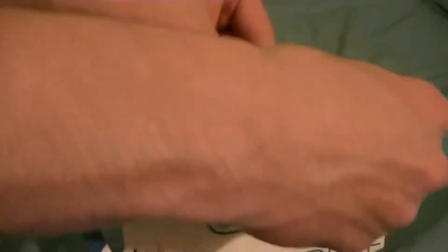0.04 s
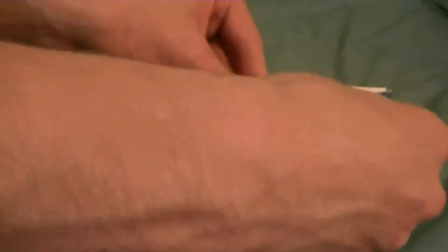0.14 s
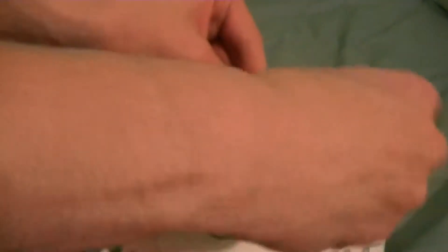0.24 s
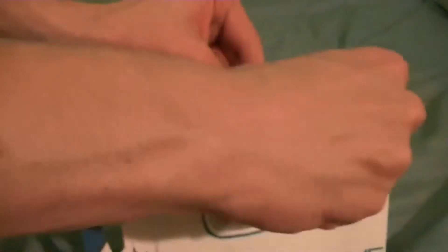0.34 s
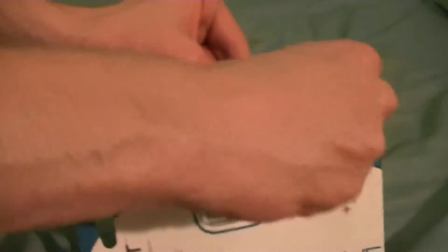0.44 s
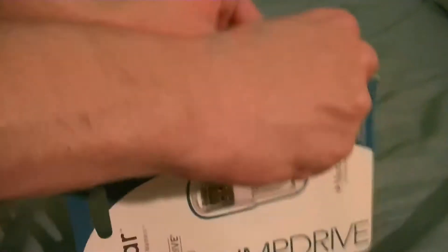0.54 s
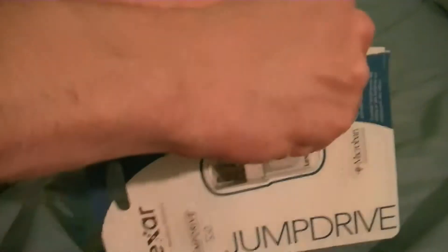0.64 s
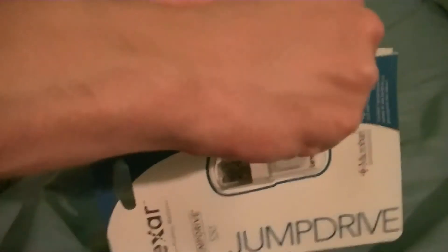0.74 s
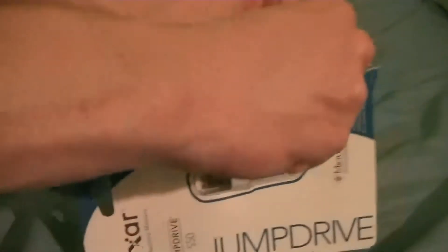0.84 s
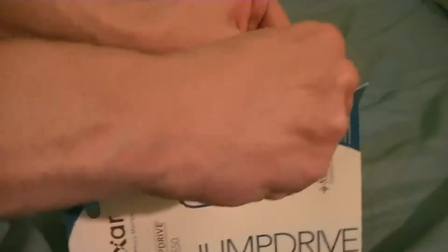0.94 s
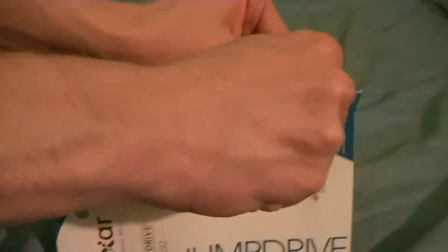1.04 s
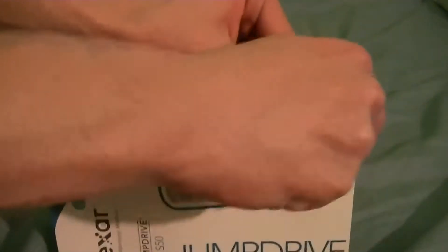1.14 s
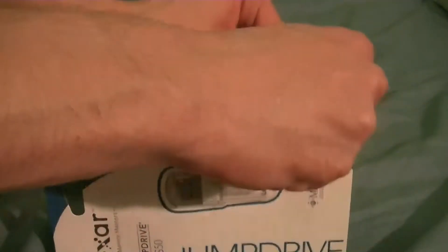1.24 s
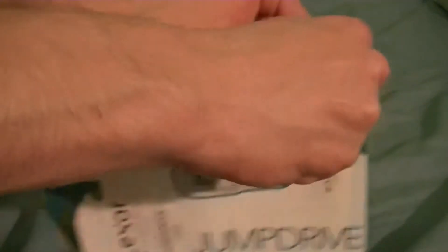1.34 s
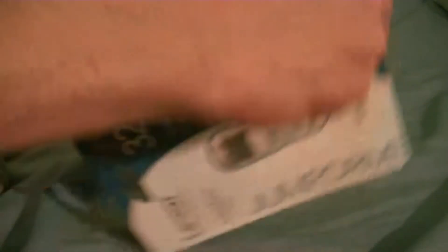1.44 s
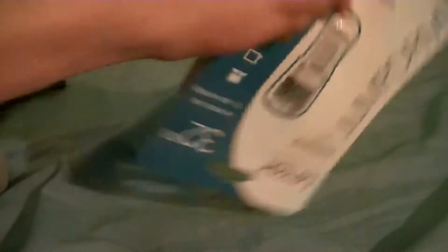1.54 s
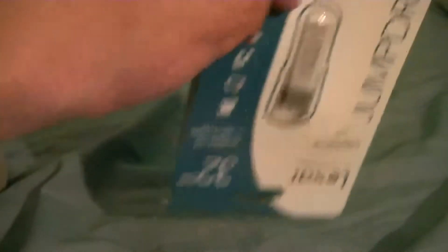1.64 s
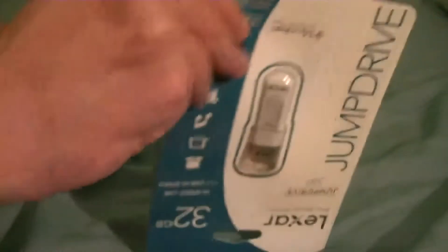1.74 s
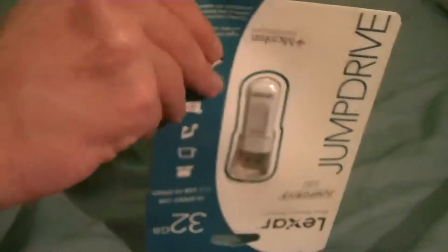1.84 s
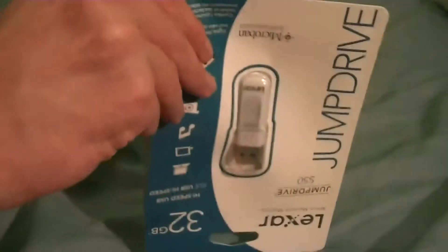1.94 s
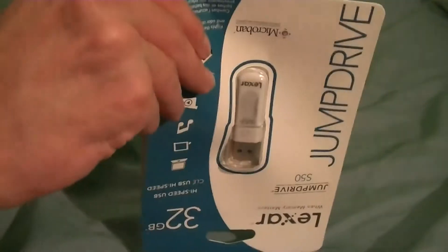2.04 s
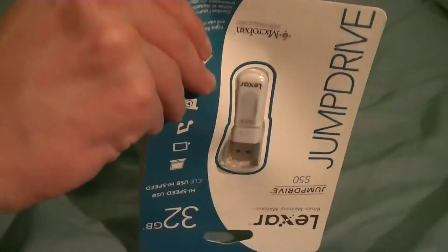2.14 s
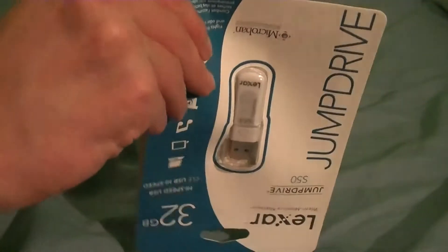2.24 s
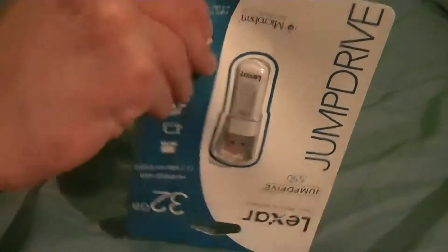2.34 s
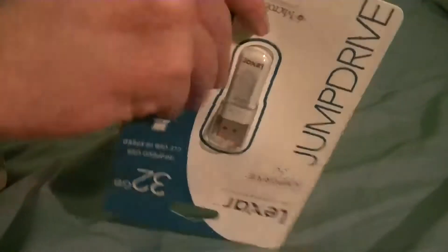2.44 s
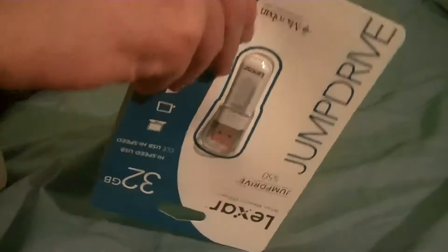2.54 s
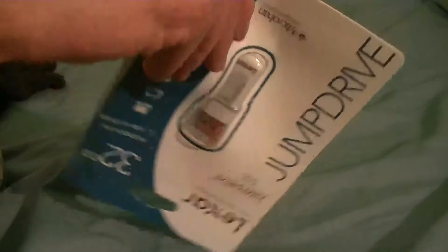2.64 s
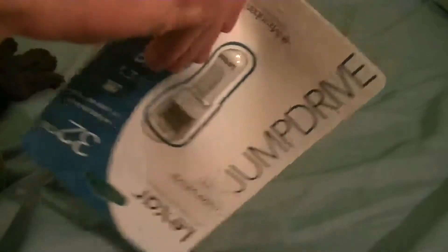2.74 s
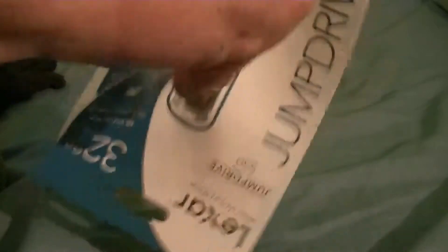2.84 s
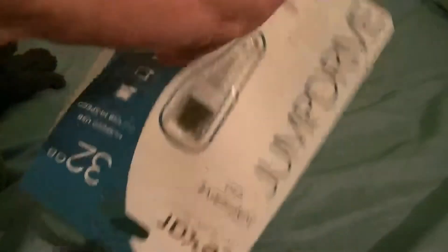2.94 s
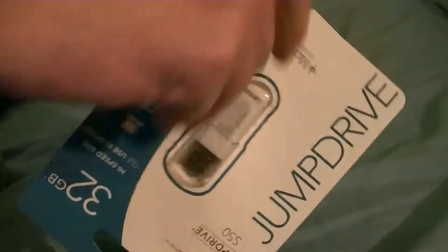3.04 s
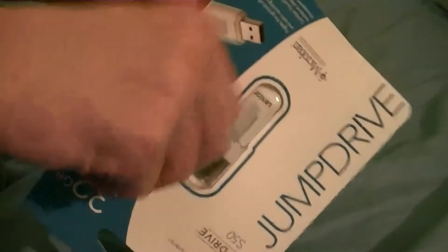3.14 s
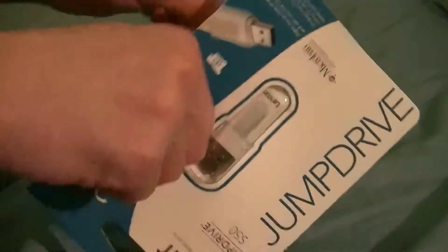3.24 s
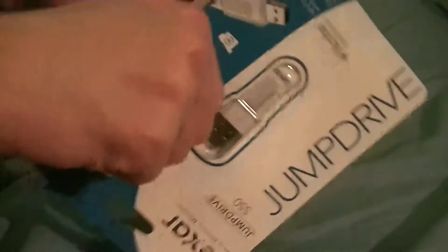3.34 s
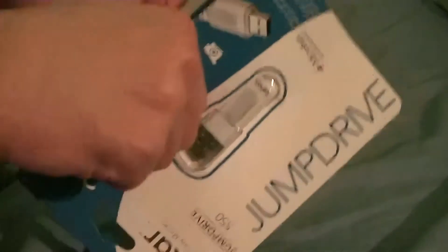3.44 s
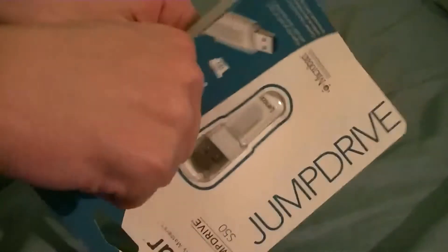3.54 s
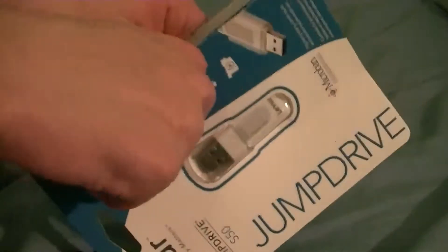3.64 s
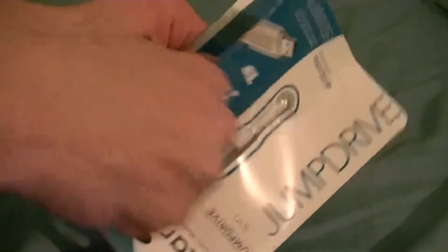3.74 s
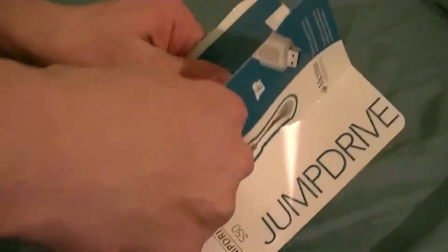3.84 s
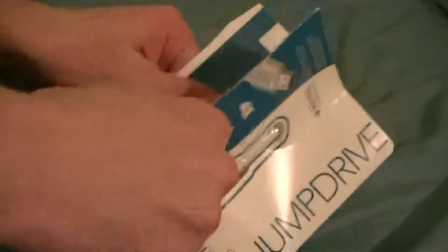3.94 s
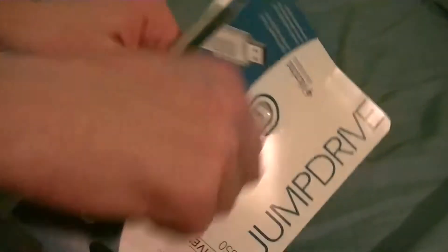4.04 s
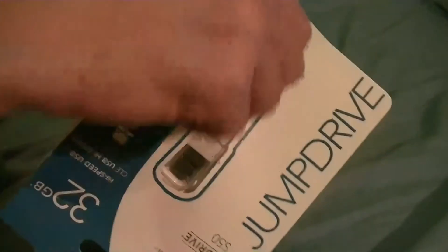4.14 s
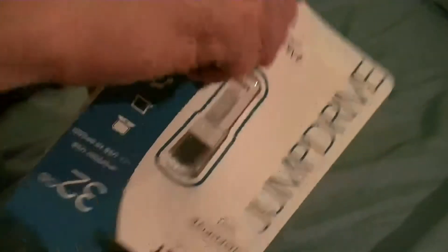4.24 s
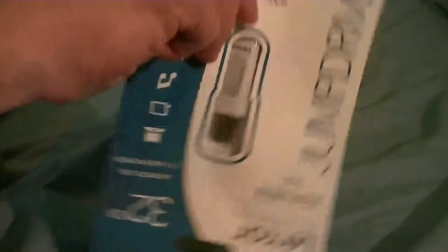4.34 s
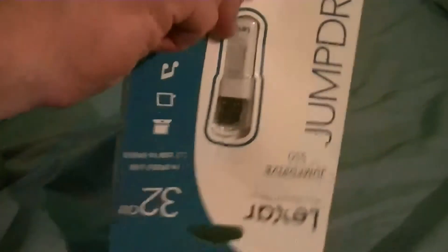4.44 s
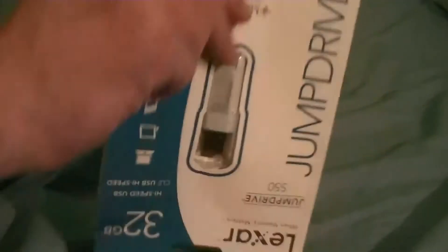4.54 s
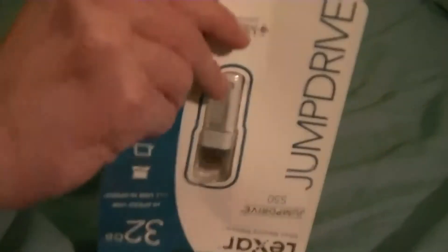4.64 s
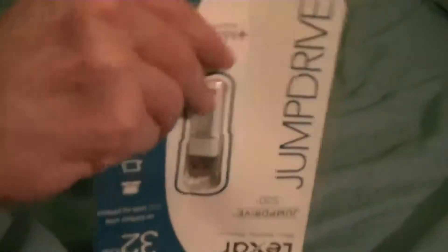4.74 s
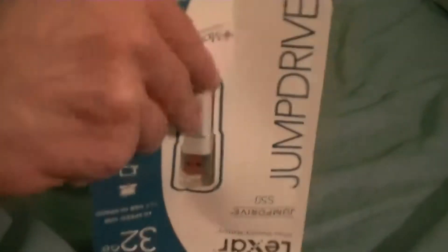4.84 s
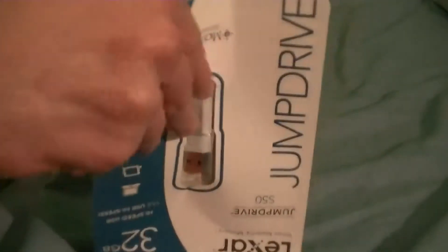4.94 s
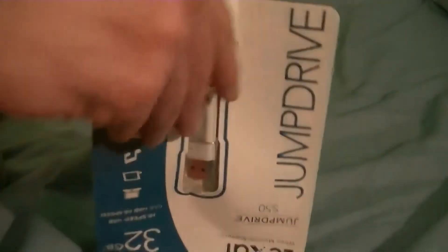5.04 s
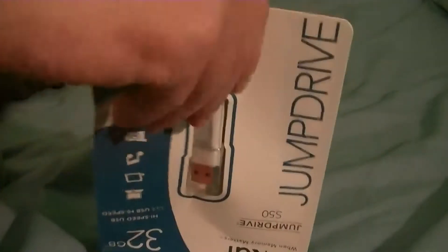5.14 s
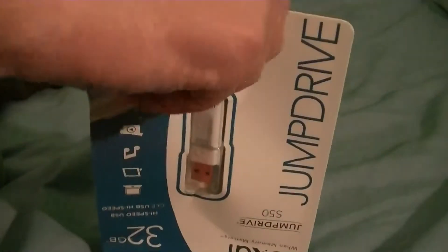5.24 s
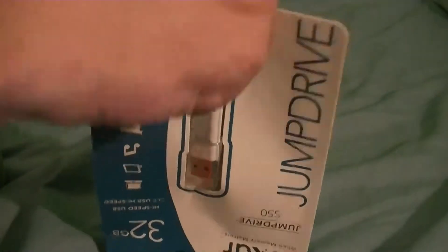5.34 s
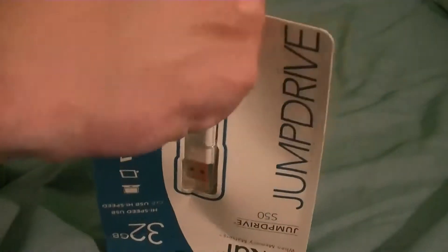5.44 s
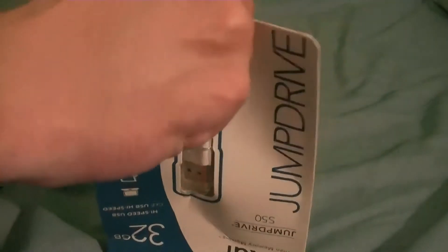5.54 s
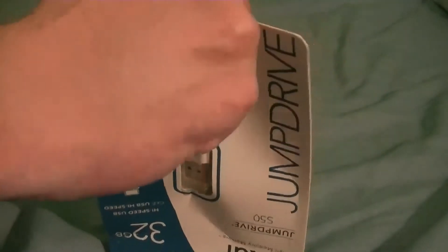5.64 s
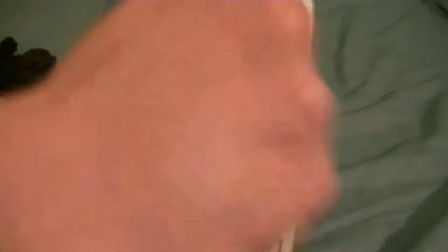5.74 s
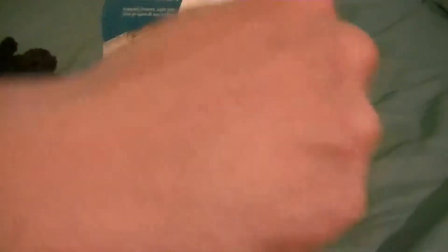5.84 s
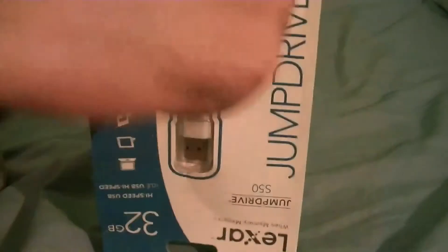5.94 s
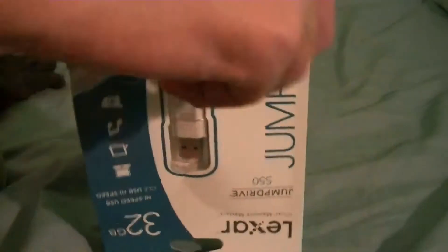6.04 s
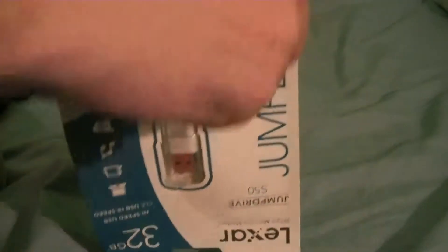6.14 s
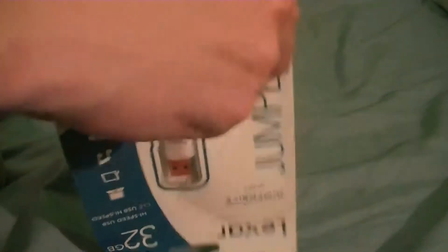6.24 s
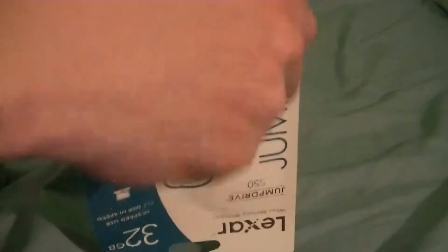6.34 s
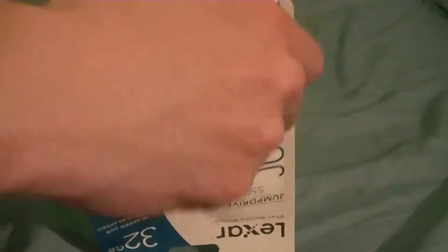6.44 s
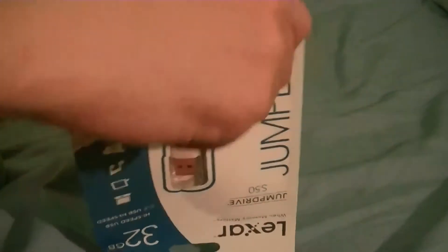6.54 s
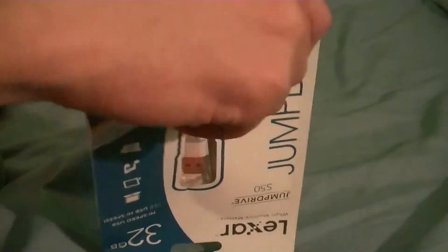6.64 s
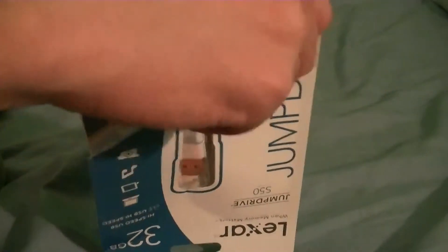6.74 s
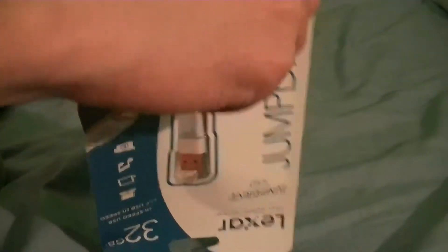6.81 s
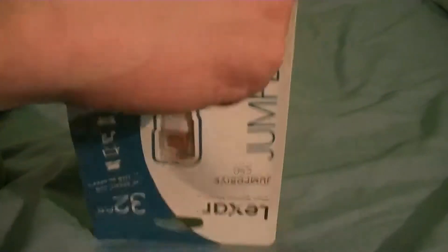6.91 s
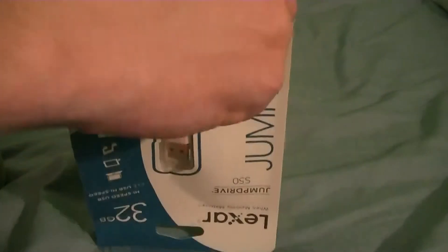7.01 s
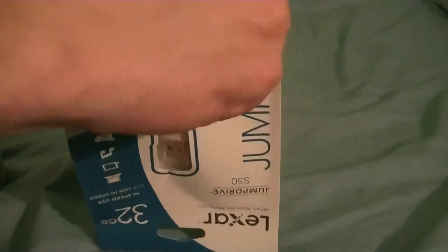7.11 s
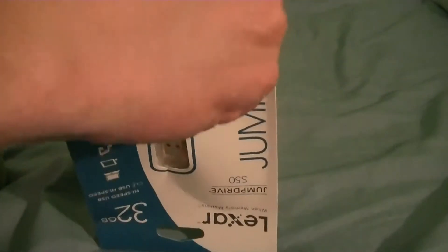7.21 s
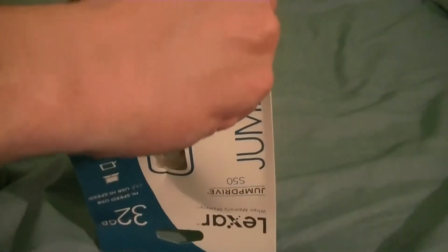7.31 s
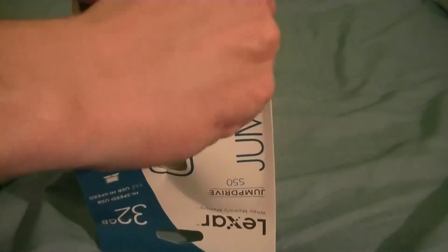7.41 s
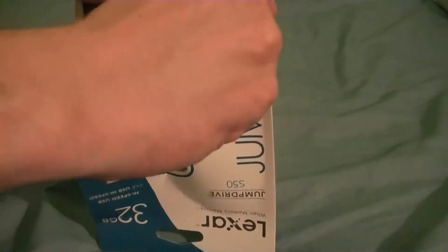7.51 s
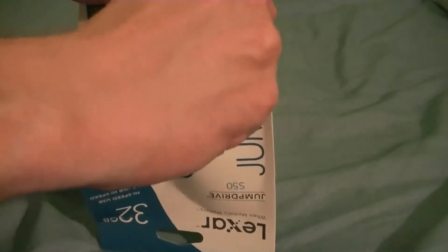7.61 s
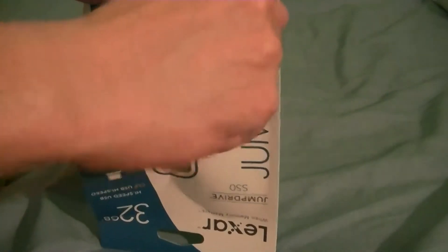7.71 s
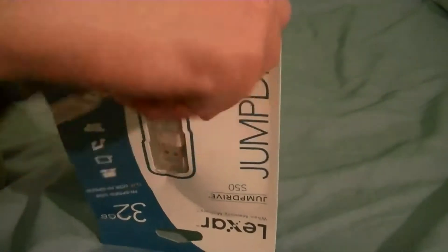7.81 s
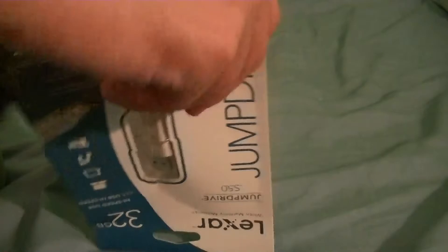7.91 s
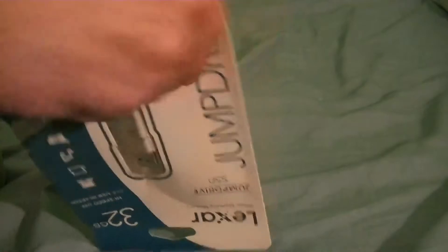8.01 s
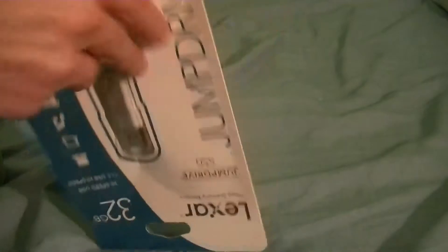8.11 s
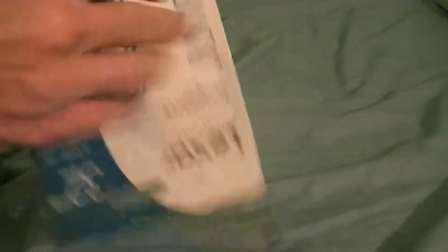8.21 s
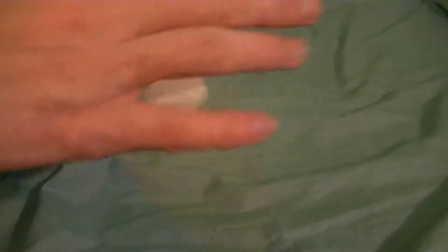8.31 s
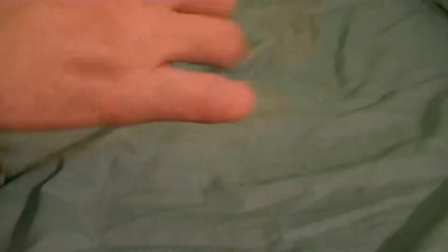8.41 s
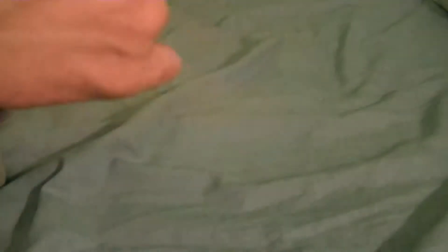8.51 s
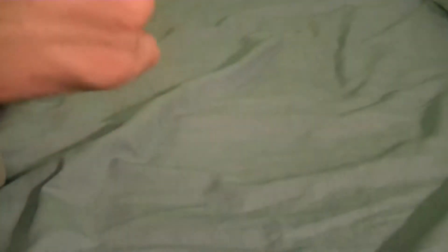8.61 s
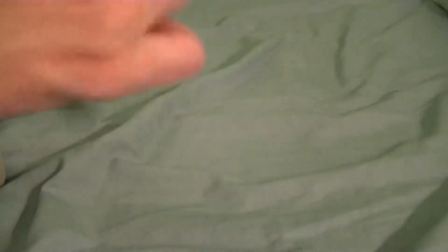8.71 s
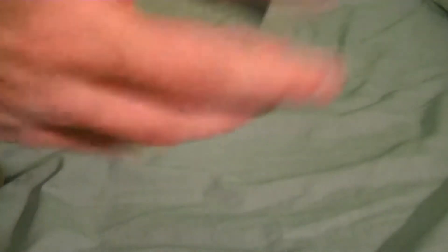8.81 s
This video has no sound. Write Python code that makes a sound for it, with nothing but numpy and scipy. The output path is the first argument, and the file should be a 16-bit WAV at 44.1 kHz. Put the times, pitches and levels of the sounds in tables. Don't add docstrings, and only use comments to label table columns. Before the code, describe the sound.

A blister pack is worked open by hand on a bed, very near the microphone. Dry card rustling swells and fades with each pull; glue and plastic give way in three main clusters of loud snaps, the last the heaviest. Between them are light ticks, fingertip scrapes and short rubbery squeaks. The handling thins out, then a final small flurry of peeling and rustle ends it, with faint air hiss beneath.

```python
import sys
import numpy as np
from scipy import signal
from scipy.io import wavfile
from scipy.ndimage import uniform_filter1d

SR = 44100
rng = np.random.default_rng(int(sys.argv[2]) if len(sys.argv) > 2 else 0)


def volts(x):
    e = np.asarray(x, float) / 20
    return 10 ** e


def master_out(mix):
    frames = np.transpose(np.atleast_2d(mix))
    ceiling = np.clip(frames, -1, 1)
    pcm = np.round(ceiling * 32767).astype(np.int16)
    wavfile.write(sys.argv[1], SR, pcm)


N = 391166

# time in seconds, pressure in dB, card flex in dB.
GRIP = [(0, -63.5, -4.5), (.3, -75, 7), (.39, -56, -1), (.62, -56, -2), (.68, -62.5, -0.5),
        (2.151, -71.5, 5), (2.53, -58.5, -9), (2.72, -62, 2.5), (3.7, -87, -15), (4.84, -75, 2),
        (4.91, -60.5, -5.5), (5.14, -62.5, -5.5), (5.55, -80.5, 12), (7.3, -76.5, 1), (7.661, -69, -2.5),
        (8.08, -59.5, -4), (8.249, -75, 4), (8.87, -76.5, 5)]
# peak in seconds, pressure in dB, build-up in seconds, release in seconds,
# card flex in dB.
PULLS = [(.22, -58, 0.066, 0.14, -2.5), (.89, -54, 0.09, 0.15, -5), (1.41, -52.5, 0.27, 0.12, -2),
         (1.6, -64.5, 0.08, 0.16, -1.5), (2.01, -66, 0.046, 0.075, -3), (2.22, -61.5, 0.049, .1, -2),
         (2.38, -55, 0.11, 0.037, -4), (2.419, -50, 0.038, 0.015, -1), (2.808, -40, 0.047, 0.1, -4.5),
         (2.91, -58, .06, 0.081, -3.5), (3.26, -62, 0.059, 0.45, 3.5), (3.508, -61, 0.14, 0.081, -17),
         (3.73, -52.5, 0.067, 0.07, 5), (4.05, -50, 0.092, 0.097, -8), (4.24, -62, 0.42, 0.085, -5.5),
         (4.372, -56, 0.039, 0.16, -4.5), (4.53, -58, 0.023, 0.35, 0), (4.751, -47.5, 0.069, 0.047, -13),
         (5.46, -64, 0.088, 0.062, -2), (5.69, -37, 0.038, 0.091, 3), (6.22, -60, 0.22, 0.14, -2),
         (6.59, -54.5, 0.11, 0.088, -2.5), (6.85, -50, 0.086, 0.067, 0.5), (7.089, -57, 0.088, 0.062, -3),
         (8.1, -51.5, 0.03, 0.02, -8), (8.21, -60, 0.012, 0.068, 3), (8.45, -60.5, 0.084, 0.095, -6)]
PULL_SPAN_DB = 12
# frequency in Hz, level in dB per Hz.
RUSTLE_COLOUR = [(35, -38), (60, -69), (140, -25.5), (691, -3.5), (1010, -6.5), (1650, 0.5), (2400, 5.5),
                 (4530, -2), (6450, -19), (9610, -17), (15000, -36), (16500, -41)]
# frequency in Hz, width in Hz, level in dB.
CARD_MODES = [(805, 37, -11.5), (920, 140, -0.5), (1305, 184, 6), (1830, 36, 6.5), (2280, 21, -23),
              (3396, 120, 2)]
FIZZ_DB, FIZZ_PER_FLEX, FIZZ_PER_PRESSURE = -6.5, -0.45, -0.068
SURGE_DB = 1.2
# start in seconds, rms level in dB, length in ms, centre in Hz.
PEELS = [(0.045, -53, 34.4, 1820), (0.472, -54, 67, 1800), (0.798, -56.5, 19, 1280), (1.078, -52, 33, 1500),
         (1.248, -53.5, 96, 2110), (1.3, -58.5, 144, 9300), (1.384, -49, 30, 1770), (2.292, -60, 55, 1440),
         (2.788, -43, 41, 2260), (3.135, -57, 90, 9600), (3.229, -46, 63, 1430), (3.487, -65, 53, 2940),
         (3.676, -41, 33, 2270), (3.721, -46, 17, 1770), (3.744, -42.5, 26, 1250), (4.02, -52.5, 107, 2570),
         (4.18, -58.5, 111, 1290), (4.372, -45.5, 13, 2400), (4.505, -44.5, 33.4, 1570),
         (5.655, -36.5, 29, 3300), (5.68, -41, 29, 1800), (8.469, -57, 46, 1500), (2.785, -45, 59, 6800),
         (8.098, -53, 39, 3000), (3.68, -48, 22, 3400), (1.19, -60, 70, 1180), (5.83, -69, 37, 9030),
         (5.722, -44, 80, 1800), (6.057, -56, 13.5, 2830), (6.154, -51.5, 25, 1760), (6.201, -44, 49, 1850),
         (6.593, -55, 47, 1480), (6.854, -38, 34.8, 1600), (7.291, -57, 37, 1680), (8.06, -80, 35, 2800),
         (8.092, -49, 53, 1650), (8.227, -49.5, 38, 1860)]
# start in seconds, rms level in dB, length in ms.
SCRAPES = [(0.19, -58, 37), (1.66, -62, 22), (1.7, -64.5, 61), (2.015, -71, 63), (4.2, -66.5, 164),
           (0.329, -58.5, 34), (.72, -62, 48), (0.967, -56.5, 99), (1.431, -54, 23), (2.599, -54, 94),
           (2.61, -61, 10), (3.371, -59, 61), (4, -52.5, 40), (4.429, -59, 40), (4.945, -59.5, 110),
           (5.04, -53, 30), (5.15, -67, 47), (5.281, -58.5, 39), (5.84, -55, 9.1), (6.254, -54.5, 37),
           (2.957, -56.5, 210), (6.8, -48, 35), (6.384, -57, 43), (6.67, -59, 41), (6.74, -51, 70),
           (7.1, -67.5, 52), (7.41, -72.5, 27), (7.48, -70, 57), (7.71, -59, 42), (7.96, -56.5, 71),
           (6.5, -63, 38), (4.87, -63.5, 55), (2.8, -68.5, 124), (5.238, -60.5, 31), (6.8, -51, 30),
           (8.02, -53, 26), (0.31, -74, 190), (3.49, -69.5, 91), (8.638, -57, 69)]
SCRAPE_HZ, SCRAPE_SHEEN, PEEL_SHEEN = 2130, 1, -0.0023

# frequency in Hz, level in dB per Hz.
SNAP_COLOUR = [(71, -38), (120, 5.5), (2150, -2), (3240, -5.5), (3980, -11.5), (4890, -12.5), (6140, -25),
               (8190, -13), (9660, -20.5), (14300, -22.5), (16500, -61)]
# start in seconds, peak in dB, ring in Hz, length in ms,
# brightness in dB.
BREAKS = [(.244, -18.5, 2900, 0.33, -18), (1.9615, -29.5, 920, 3.9, 36), (2.729, -4.5, 3080, 1.9, 11),
          (2.7537, -6, 2160, 1.45, 24), (2.7703, -11, 3060, 1.76, 14), (2.909, -30, 2180, 11, 29),
          (3.6764, -22, 1290, 2.4, -33), (3.7128, -13.5, 2200, 0.73, -22), (3.7375, -9, 1960, 1.1, 3),
          (4.3533, -16, 2070, 0.14, -28), (4.385, -21.5, 2420, 1.3, -20), (5.573, -26.5, 1770, 0.28, -5),
          (5.6328, -5, 1800, 3.3, -5), (5.6695, -13.5, 1320, 5.9, 1), (5.701, -6, 2050, 1.4, -6),
          (5.711, -9.5, 1360, 1.3, -38), (6.1392, -24.5, 2780, 1.6, -13), (6.777, -22, 1120, 2.5, 0),
          (6.866, -15, 1830, 2.4, -34), (6.8788, -15.5, 1840, 4.1, -29), (7.1312, -27.5, 1580, 4.6, -20),
          (7.9955, -21.5, 1980, 0.31, -5), (8.1986, -21.5, 714, 6.6, 0), (8.2261, -25, 766, 3.6, 6)]
# start in seconds, peak in dB, ring in Hz.
TICKS = [(0.147, -40, 3480), (.6873, -31, 2980), (0.8703, -38.5, 1570), (1.0946, -30, 715),
         (2.0813, -32.5, 3000), (2.227, -40, 9250), (2.246, -37, 1570), (2.992, -29, 2060),
         (3.3433, -37, 4444), (3.6955, -38, 1230), (3.943, -31.5, 3680), (4.019, -24.5, 1660),
         (4.415, -33, 1030), (5.131, -29, 2600), (5.3793, -39, 1270), (5.455, -39.5, 1900),
         (5.477, -38.5, 1370), (7.8639, -24, 1860), (7.959, -31.5, 2640), (8.3686, -44, 1570),
         (8.3878, -39.5, 2470), (8.4208, -36, 2890), (8.657, -35, 2280), (8.6931, -52, 2470)]
TICK_MS, TICK_BRIGHT_DB = 1.76, -0.5
# start in seconds, peak in dB, ring in Hz.
POPS = [(0.299, -39.5, 670), (0.809, -30, 1160), (0.8166, -28, 1490), (1.481, -39.5, 493),
        (1.5302, -39.5, 604), (1.874, -39, 2150), (2.1155, -42.5, 604), (2.161, -36.5, 1520),
        (2.1843, -37.5, 1470), (3.0337, -33, 2340), (3.2305, -32, 3240), (3.8924, -39.5, 1230),
        (4.9334, -48, 686), (5.059, -32, 600), (5.224, -45, 1660), (5.2368, -39, 2420),
        (5.725, -19.5, 1230), (5.897, -39.5, 950), (6.7205, -35, 895), (7.247, -44, 1790),
        (7.2923, -30.5, 1520), (7.887, -36, 1060), (7.9334, -29, 1753), (8.259, -33.5, 1970),
        (8.637, -31, 2120), (6.46, -47, 910), (6.4824, -35.5, 3060), (6.577, -27.5, 1980)]
POP_MS, POP_BRIGHT_DB = 3.2, -33
# start in seconds, peak in dB, ring in Hz.
CRACKLES = [(0.056, -35, 1380), (0.2027, -32, 1510), (0.258, -33, 1660), (0.3388, -41, 930),
            (0.7324, -32, 1870), (0.823, -39, 2990), (0.853, -40, 2820), (1.0649, -37, 1510),
            (1.6402, -40.5, 1310), (1.8125, -41, 2500), (1.8468, -39, 2080), (1.8521, -49, 1530),
            (1.9185, -47, 1420), (1.9316, -43, 710), (1.9874, -39.5, 1360), (2.0342, -33, 1440),
            (2.0852, -28.5, 1570), (2.101, -55, 1510), (2.15, -45, 1420), (2.2008, -36, 1550),
            (2.2092, -34.5, 1100), (2.214, -39, 2110), (2.294, -35, 3530), (2.559, -43, 970),
            (2.6154, -41, 2480), (3.14, -38, 1550), (3.2957, -33, 900), (3.367, -44, 2390),
            (3.6672, -38, 2000), (3.7907, -34, 1740), (4.4308, -35, 1870), (4.459, -39, 8530),
            (4.5888, -40, 2410), (4.8708, -44, 2450), (4.9713, -40, 1960), (5.2597, -44, 2040),
            (5.3432, -47, 710), (5.4385, -42, 700), (5.4907, -45, 2130), (5.9891, -49, 3100),
            (6.3079, -38, 1850), (6.5435, -43, 3360), (6.6172, -28.5, 1030), (6.6253, -27.5, 1200),
            (6.651, -40, 1490), (6.671, -50, 2110), (6.8437, -31, 7500), (6.9025, -31, 1790),
            (6.9256, -38, 1100), (6.951, -44, 2480), (7.0179, -43, 8600), (7.4155, -41.5, 1780),
            (7.4865, -43, 1180), (7.6577, -43.5, 2110), (7.6926, -49, 1340), (7.8123, -45, 1420),
            (7.9113, -46, 1490), (7.9488, -35, 1870), (7.991, -30, 2220), (8.0668, -43, 3170)]
CRACKLE_MS, CRACKLE_BRIGHT_DB = 0.99, -15
# start in seconds, peak in dB, ring in Hz, length in ms.
CRUNCHES = [(2.7607, -21, 1500, 0.67), (2.7765, -17, 3200, 0.77), (2.8005, -33, 2000, 1.3),
            (2.8065, -21, 1100, 1.6), (2.812, -24, 2900, 1.7), (3.6935, -27, 3300, 1.3),
            (3.698, -28, 1300, 1.8), (3.7246, -24, 1300, 0.89), (3.7308, -21, 2000, 1.3),
            (3.749, -22, 1300, 1), (3.7537, -28, 1700, 1.2), (3.756, -23.5, 1400, 1.3),
            (3.761, -34, 1100, 1.7), (5.6436, -22, 1300, 1.7), (5.6745, -14, 2600, 1),
            (5.685, -21, 1700, 2), (5.694, -21, 1800, 3), (5.7039, -6.5, 2480, 0.71),
            (5.7133, -11, 2060, 4.7), (5.7286, -22, 1500, 1.7), (5.74, -19, 1600, 1.5),
            (5.7528, -20, 1400, 2.3), (5.767, -22, 2000, 1.5), (8.383, -43, 2000, 1), (8.444, -40, 2400, 3),
            (8.486, -42, 1500, 3), (8.503, -44, 1100, 2.3), (8.667, -36, 2090, 1.3),
            (3.7378, -12.5, 1970, 0.65), (5.2372, -29.5, 2430, .3), (5.1311, -29.5, 3170, .3),
            (2.771, -15, 3100, 1.8)]
CRUNCH_BRIGHT_DB = -25
# start in seconds, peak in dB.
THUMPS = [
    (2.729, -5.5),
    (2.754, -16),
    (5.633, -11),
    (8.194, -41),
]

# time in seconds, slip rate in Hz, level in dB.
SQUEAKS = [
    [(.533, 590, -53), (.585, 650, -52), (.607, 780, -48), (.632, 640, -56)],
    [(1.33, 660, -55), (1.35, 740, -52), (1.375, 700, -54)],
    [(1.4, 830, -49), (1.425, 588, -55)],
    [(2.31, 520, -59), (2.35, 430, -59)],
    [(2.398, 600, -54), (2.417, 1000, -47), (2.431, 740, -45), (2.443, 950, -56)],
    [(3.248, 1240, -52), (3.257, 1257, -35), (3.268, 1198, -52), (3.29, 1264, -50)],
    [(3.275, 913, -51), (3.295, 890, -48.5), (3.312, 860, -54)],
    [(4.185, 460, -59), (4.225, 520, -57), (4.245, 640, -52), (4.27, 520, -58)],
    [(4.501, 1927, -45), (4.512, 2030, -34), (4.516, 1786, -36), (4.521, 1430, -27), (4.535, 670, -68)],
    [(6.22, 1620, -53), (6.232, 1633, -38.5), (6.24, 1550, -47)],
    [(8.102, 1045, -52), (8.112, 1220, -36), (8.116, 1340, -30)],
    [(8.115, 1730, -37), (8.121, 1830, -36.5), (8.127, 1870, -53)],
]
# multiple of the slip rate, level in dB.
SQUEAK_ORDERS = [(1, 0), (2, -5), (3, -2), (4, -18)]

# frequency in Hz, time to fall 60 dB in seconds.
ROOM_DECAY = [(150, 0.049), (1000, 0.28), (4000, 0.23), (12000, 0.12)]
# frequency in Hz, level in dB per Hz.
HUSH_COLOUR = [(18, -73.5), (30, -16), (112, -23.5), (212, -10.5), (340, -6), (752, -5), (1240, -7.5),
               (12700, -31.5), (16500, -31.5)]
HUSH_DB = -75.5
# frequency in Hz, left-right likeness from 0 to 1.
HUSH_SAME = [(60, 0.09), (200, 0.65), (800, 0.35), (8000, 0.51)]
# frequency in Hz, left-right difference re their sum in
# dB.
SIDE_FLUTTER = [(60, -30), (200, -27), (1000, -32), (2000, -25), (4000, -20), (8000, -23), (12000, -17)]


def evened(x):
    return x / np.sqrt(np.mean(x ** 2) + 1e-20)


def read(points, hz):
    f, value = np.transpose(points)
    return np.interp(np.log(hz + 1), np.log(f + 1), value)


def add(mix, s, sound):
    part = mix[round(s * SR):][:len(sound)]
    part += sound[:len(part)]


def causal(points, size=1024):
    gain_db = read(points, abs(np.fft.fftfreq(4 * size, 1 / SR)))
    log_gain = np.log(volts(np.maximum(gain_db, -100)))
    phase = -signal.hilbert(log_gain).imag
    return np.fft.ifft(np.exp(log_gain + 1j * phase)).real[:size]


def resonate(x, hz, width):
    return signal.lfilter(*signal.iirpeak(np.clip(hz, 50, 20000), hz / width, SR), x)


def drift(size):
    return evened(uniform_filter1d(uniform_filter1d(rng.standard_normal(N), size), size))


def hands(t):
    s, grip_db, grip_flex_db = np.transpose(GRIP)
    peak, db, rise, fall, flex_db = np.transpose(PULLS)[:, :, None]
    before = (peak - t) / np.maximum(rise, .005)
    after = (t - peak) / np.maximum(fall, .005)
    away = np.maximum(before, after)
    grip = volts(2 * np.interp(t, s, grip_db))
    pulls = volts(2 * (db - PULL_SPAN_DB * away))
    total = grip + pulls.sum(0)
    flex = (grip * np.interp(t, s, grip_flex_db) + (pulls * flex_db).sum(0)) / total
    return 10 * np.log10(total), flex


def rubbed_card(slips_per_s=6000, spread_db=2.0, hiss=0.95, clump_db=1.04, patchy_db=2.0):
    sizes = volts(spread_db * np.minimum(rng.exponential(1, N), 4.))
    slips = sizes * (rng.random(N) < slips_per_s / SR)
    drive = evened(slips * rng.choice([-1., 1.], N)) + hiss * rng.standard_normal(N)
    drive = evened(drive * volts(clump_db * drift(size=70) + SURGE_DB * drift(size=700)))
    hz, t, z = signal.stft(drive, SR, nperseg=256, noverlap=192)
    pressure_db, body_db = hands(t)
    fizz_db = FIZZ_DB + FIZZ_PER_FLEX * body_db + FIZZ_PER_PRESSURE * (pressure_db + 60)
    low = 1 / (1 + (hz / 1150) ** 4)
    high = 1 / (1 + (5200 / (hz + 1)) ** 8)
    tilt_db = np.outer(low, body_db + 12.5) + np.outer(high, fizz_db + 17.0)
    patches = rng.standard_normal((len(t), len(hz)))
    patches = uniform_filter1d(uniform_filter1d(patches, size=36, axis=0), size=2, axis=1)
    z = z * volts(tilt_db + patchy_db * evened(patches).T)
    sheet = signal.istft(z, SR, nperseg=256, noverlap=192)[1][:N]
    colour = causal(RUSTLE_COLOUR)
    sheet = signal.oaconvolve(sheet, colour / np.linalg.norm(colour))[:N]
    sheet = sheet + sum(.5 * volts(db) * resonate(sheet, f, w) for f, w, db in CARD_MODES)
    return sheet, np.interp(np.arange(N) / SR, t, pressure_db)


def rub(focus=0.9):
    sheet, pressure_db = rubbed_card()
    out = sheet * volts(pressure_db - 2.0)
    strokes = [(*row, PEEL_SHEEN) for row in PEELS]
    strokes += [(*row, SCRAPE_HZ, SCRAPE_SHEEN) for row in SCRAPES]
    for start, db, ms, centre_hz, sheen in strokes:
        part = sheet[round(start * SR):][:round(ms * SR / 1000)]
        part = part + sheen * np.diff(part, prepend=0)
        part = evened(part) + focus * evened(resonate(part, centre_hz, 0.7 * centre_hz))
        add(out, start, volts(db + 0.96) * evened(part) * signal.windows.tukey(len(part), .35))
    return out


def cracks(sharpness=5.0, bounce_ms=1.9, bounce=.35, tail_db=-20, tail_ms=6.0):
    out, size = np.zeros(N), 2200
    t_ms = np.arange(size) / SR * 1000
    colour, lows = causal(SNAP_COLOUR), signal.butter(1, 4500, fs=SR)
    late = round(bounce_ms * SR / 1000)
    rows = BREAKS + [(*r, TICK_MS, TICK_BRIGHT_DB) for r in TICKS]
    rows += [(*r, POP_MS, POP_BRIGHT_DB) for r in POPS]
    rows += [(*r, CRACKLE_MS, CRACKLE_BRIGHT_DB) for r in CRACKLES]
    rows += [(*r, CRUNCH_BRIGHT_DB) for r in CRUNCHES]
    for s, db, hz, ms, bright_db in rows:
        fade = np.exp(-(t_ms / max(ms, .2)) ** 2) + volts(tail_db) * np.exp(-t_ms / tail_ms)
        splinters = rng.standard_normal(size) * fade * np.minimum(t_ms / .15, 1)
        splinters[2] += sharpness / max(ms, .5)
        splinters[late:] += bounce * splinters[:-late]
        dull = signal.lfilter(*lows, splinters)
        snap = dull + volts(bright_db + 9) * (splinters - dull)
        snap = signal.fftconvolve(snap, colour)[:size]
        snap = signal.lfilter(*signal.butter(2, 0.41 * hz, "high", fs=SR), snap)
        snap = evened(snap) + .8 * evened(resonate(dull, hz, .4 * hz))
        bubble = evened(resonate(splinters, 7160, 3200))
        snap = snap + volts(db - 6.0) * bubble
        add(out, s, volts(db - 4.5) * snap / abs(snap).max())
    return out


def thumps(thump_hz=430):
    out, t_ms = np.zeros(N), np.arange(2200) / SR * 1000
    u = thump_hz * 2 * np.pi * t_ms / 1000
    for s, db in THUMPS:
        add(out, s, volts(db) * (1 - u) * np.exp(-u) * np.minimum(t_ms / 0.13, 1))
    return out


def squeaks(jitter=.022, flutter_db=2.2, grit=.18, dull_hz=1500):
    out, wobble, flutter, uneven = np.zeros(N), drift(size=50), drift(size=60), drift(size=14)
    for rows in SQUEAKS:
        s, hz, db = np.transpose(rows)
        at = np.arange(round(s[0] * SR), round(s[-1] * SR))
        slip_hz = np.interp(at / SR, s, hz) * (1 + jitter * wobble[at])
        turns = np.cumsum(slip_hz) / SR
        tone = np.zeros(len(at))
        for k, order_db in SQUEAK_ORDERS:
            soft = 1 / (1 + ((k - 1) * slip_hz / dull_hz) ** 2)
            tone += soft * volts(order_db) * np.sin(2 * np.pi * k * turns)
        level = volts(np.interp(at / SR, s, db) + flutter_db * flutter[at])
        level = level * (1 + grit * uneven[at])
        out[at] += np.sqrt(2) * tone * level * signal.windows.tukey(len(at), .4)
    return signal.sosfilt(signal.butter(4, 320, "high", fs=SR, output="sos"), out)


def room(x, unlike=0.05):
    taps = rng.choice([-1., 1.], (3, SR // 2)) * (rng.random((3, SR // 2)) < .05)
    taps[:, :130] = 0
    hz, t, z = signal.stft(taps[0] + unlike * taps[1:], SR, nperseg=256)
    decay = volts(-60 * t / read(ROOM_DECAY, hz)[:, None])
    tail = signal.istft(z * decay, SR, nperseg=256)[1]
    return signal.fftconvolve(x[None], tail / np.linalg.norm(tail[0]), axes=1)[:, :N]


def hush():
    hz, t, z = signal.stft(rng.standard_normal((2, N)), SR, nperseg=1024)
    same = np.clip(read(HUSH_SAME, hz), 0, 1)[:, None]
    right = same * z[0] + np.sqrt(1 - same ** 2) * z[1]
    z = np.array([z[0], right]) * volts(read(HUSH_COLOUR, hz))[:, None]
    return volts(HUSH_DB) * evened(signal.istft(z, SR, nperseg=1024)[1][:, :N])


def scene():
    pack = rub() + cracks() + thumps() + squeaks()
    no_bass = signal.butter(2, 140, "high", fs=SR, output="sos")
    pack = signal.sosfilt(no_bass, pack)
    return pack + volts(-16.0) * room(pack) + hush()


def top_cut(x):
    return signal.sosfilt(signal.butter(12, 16800, fs=SR, output="sos"), x)


def record(dry):
    ceiling = .27
    held = dry / (1 + (dry / ceiling) ** 6) ** (1 / 6)
    shade = held.mean(0) * drift(size=50)
    gap = signal.oaconvolve(shade, causal(SIDE_FLUTTER))[:N]
    edge = signal.firwin(255, 15850, window=("kaiser", 3.5), fs=SR)
    mix = signal.oaconvolve(held + np.array([gap, -gap]), edge[None], "same")
    return top_cut(mix)


dry = scene()
out = record(dry)
master_out(out)
```